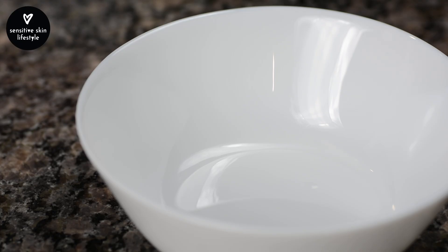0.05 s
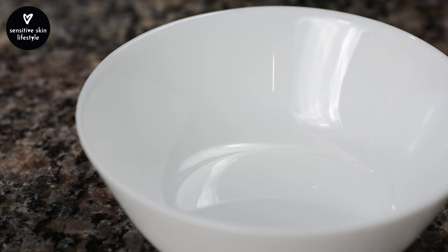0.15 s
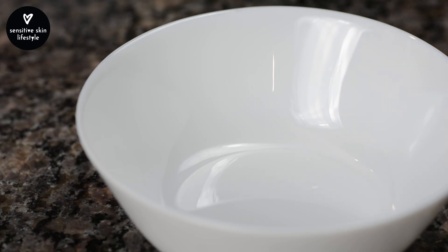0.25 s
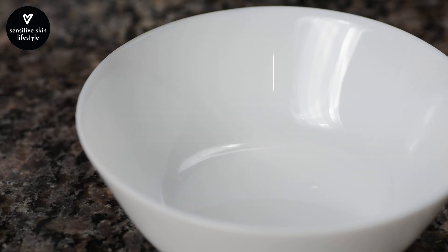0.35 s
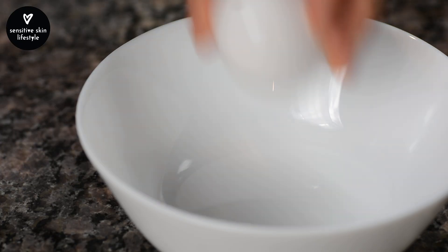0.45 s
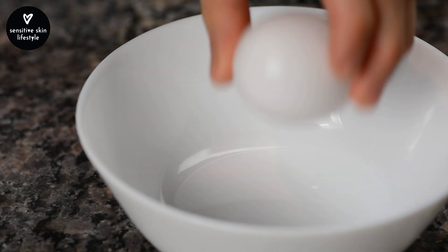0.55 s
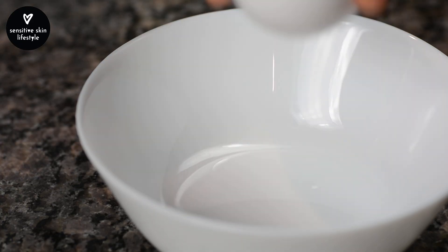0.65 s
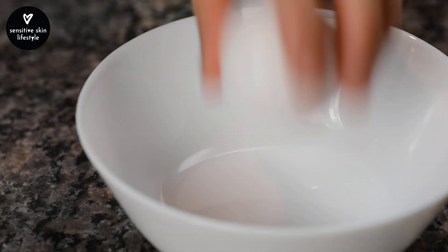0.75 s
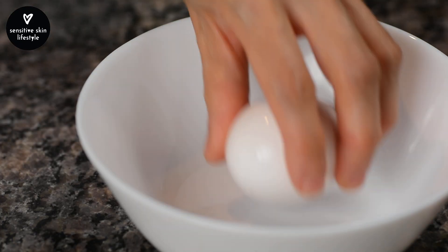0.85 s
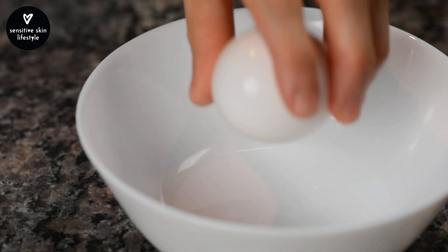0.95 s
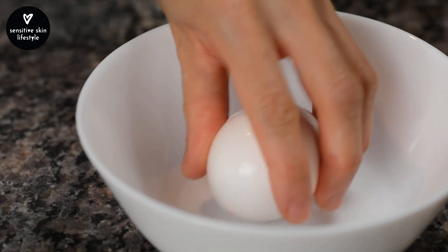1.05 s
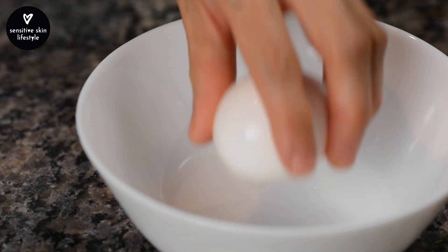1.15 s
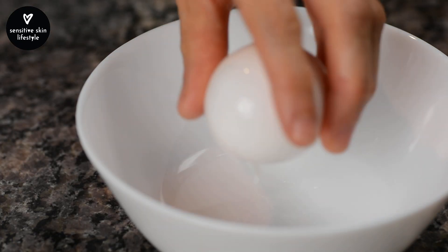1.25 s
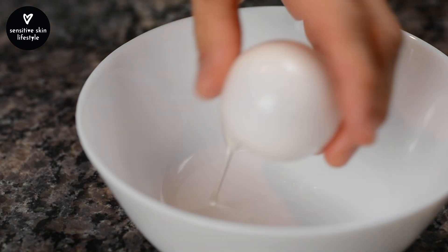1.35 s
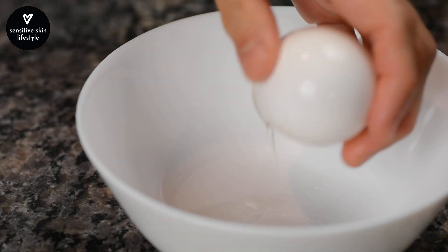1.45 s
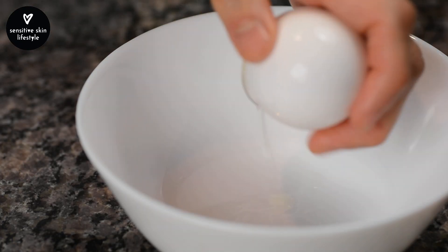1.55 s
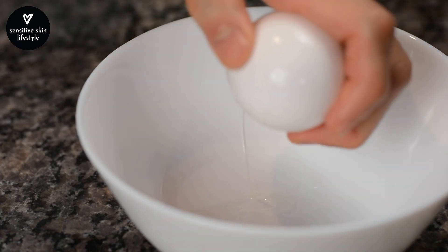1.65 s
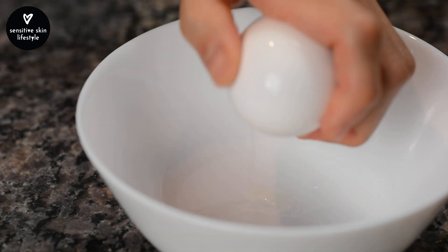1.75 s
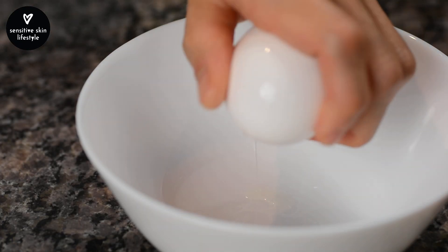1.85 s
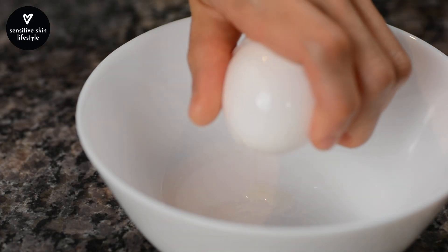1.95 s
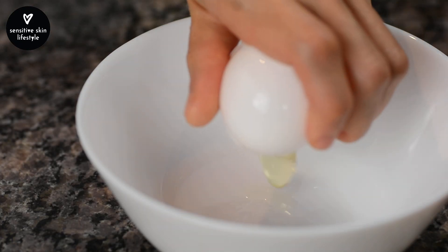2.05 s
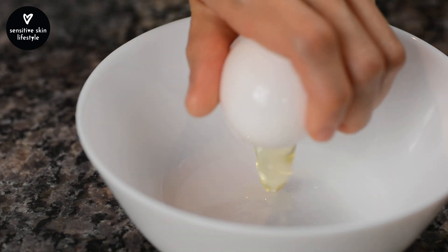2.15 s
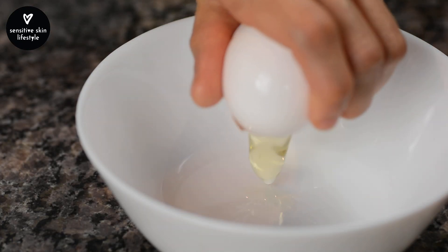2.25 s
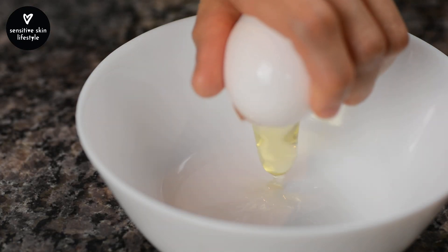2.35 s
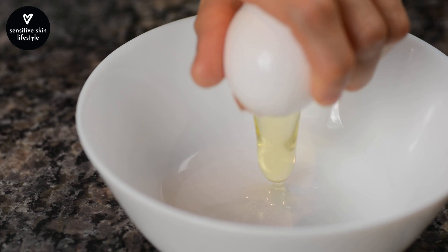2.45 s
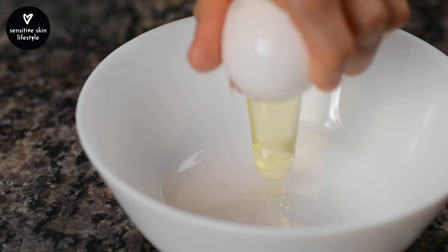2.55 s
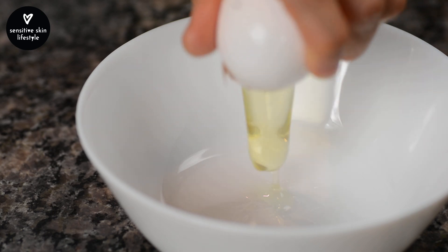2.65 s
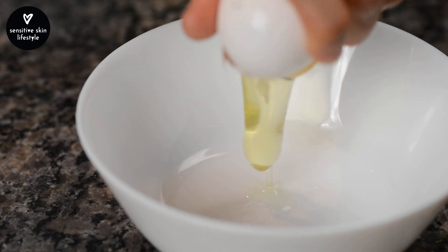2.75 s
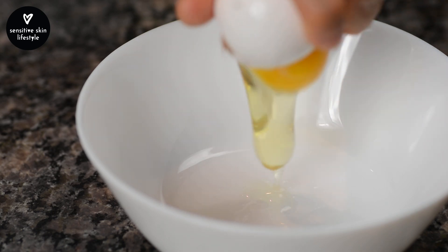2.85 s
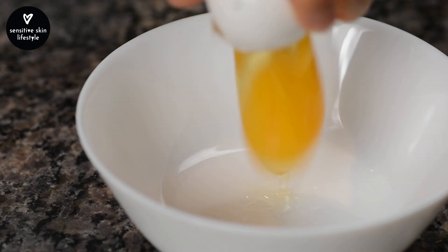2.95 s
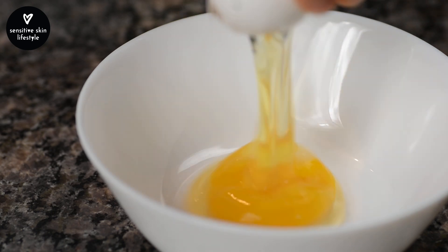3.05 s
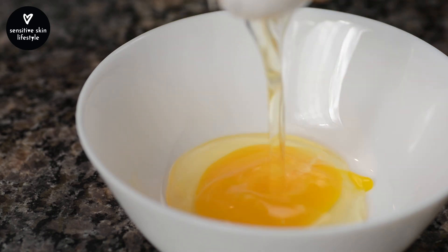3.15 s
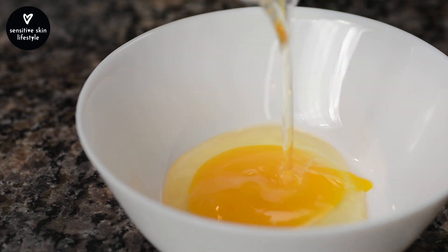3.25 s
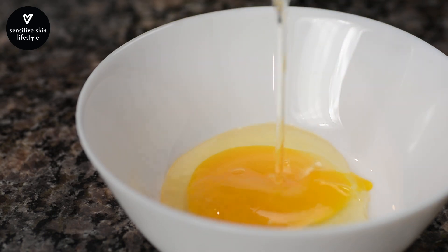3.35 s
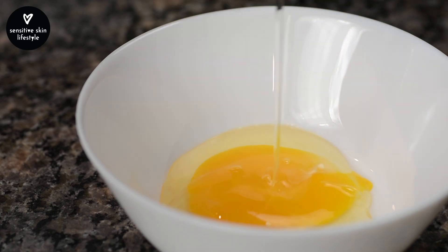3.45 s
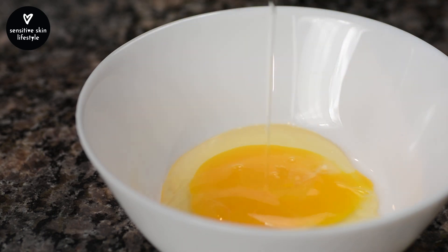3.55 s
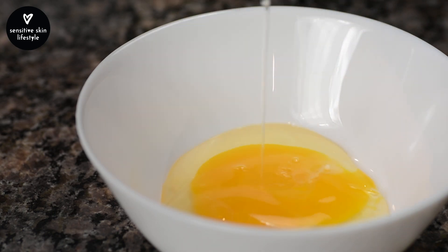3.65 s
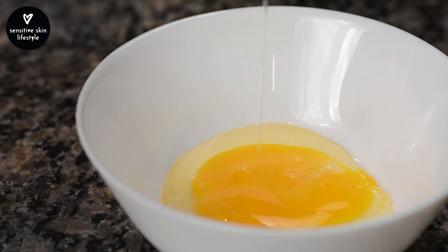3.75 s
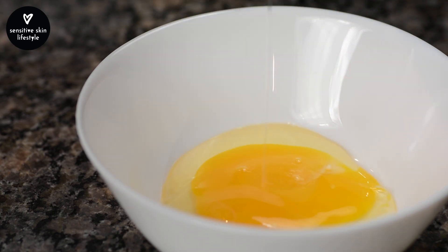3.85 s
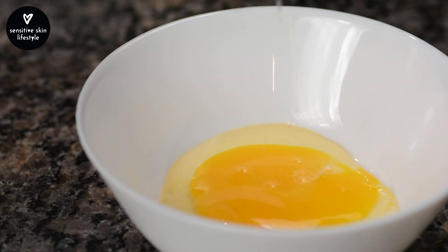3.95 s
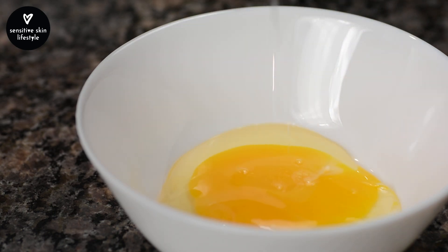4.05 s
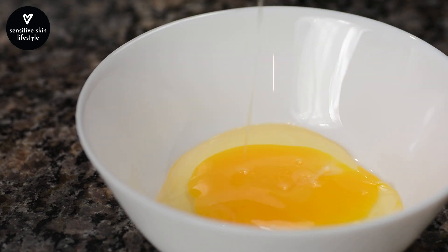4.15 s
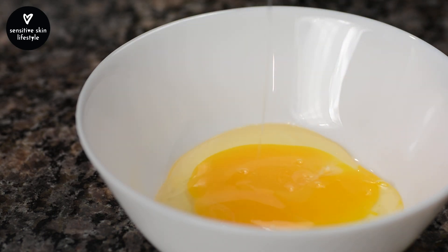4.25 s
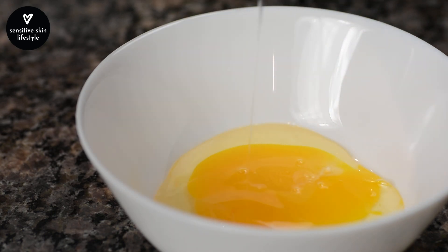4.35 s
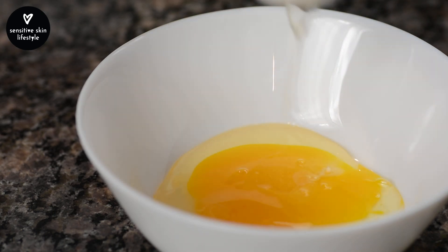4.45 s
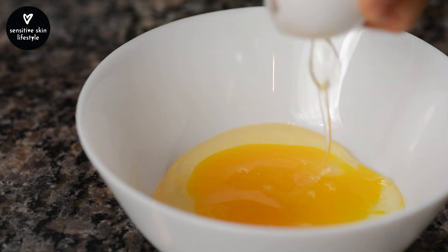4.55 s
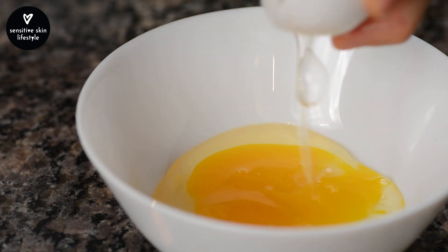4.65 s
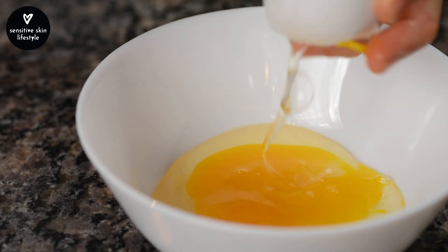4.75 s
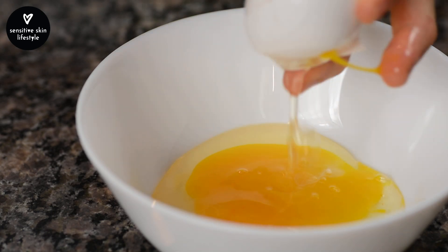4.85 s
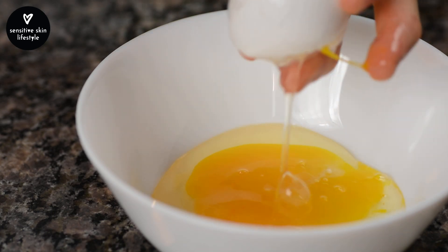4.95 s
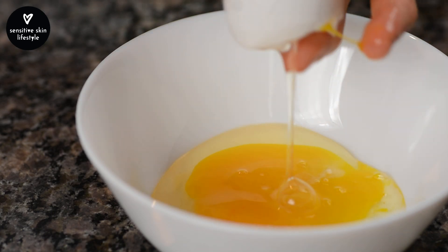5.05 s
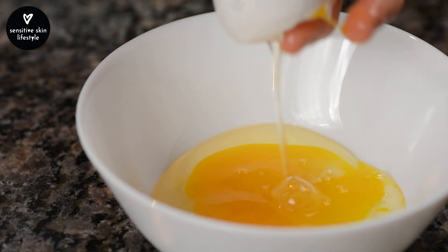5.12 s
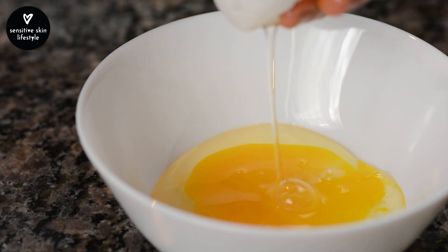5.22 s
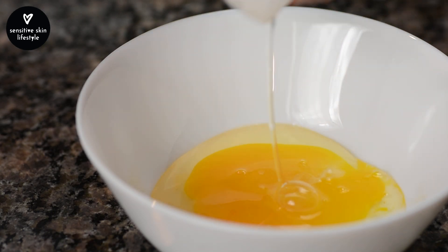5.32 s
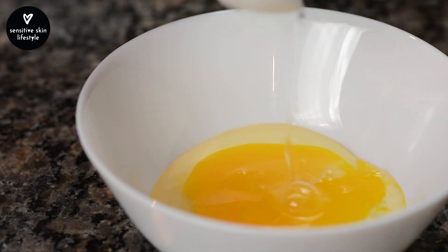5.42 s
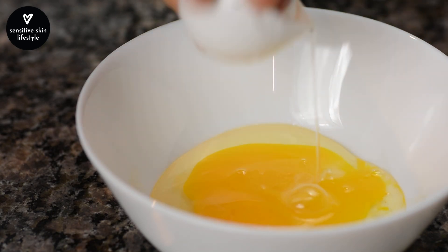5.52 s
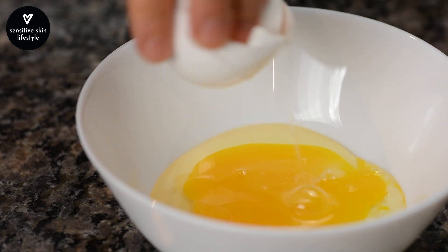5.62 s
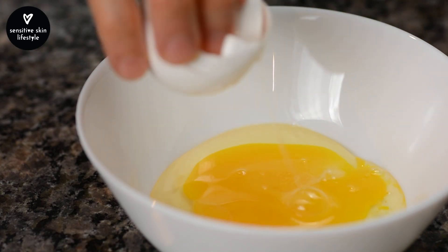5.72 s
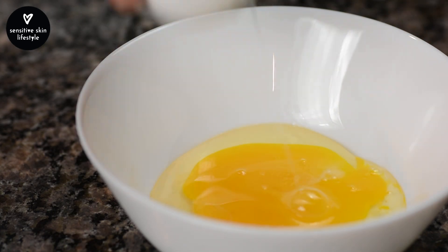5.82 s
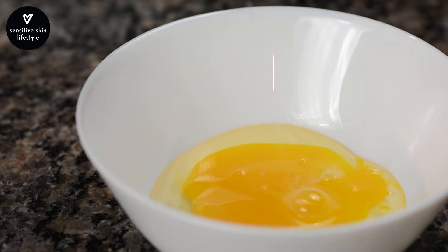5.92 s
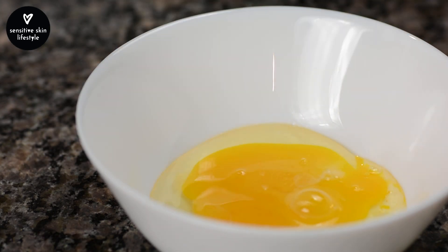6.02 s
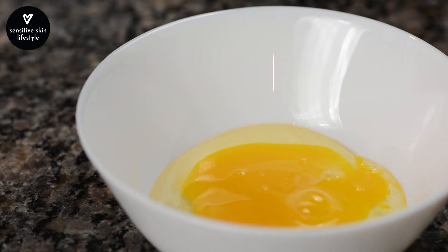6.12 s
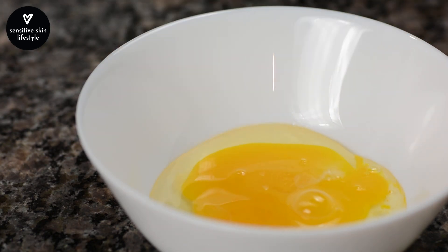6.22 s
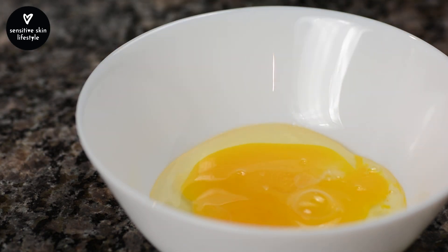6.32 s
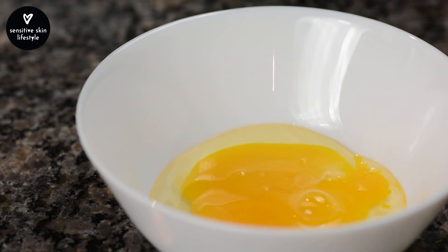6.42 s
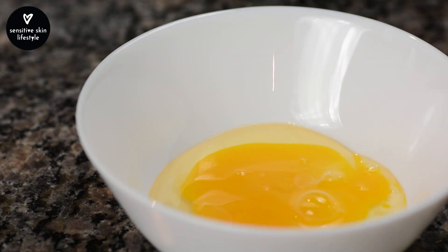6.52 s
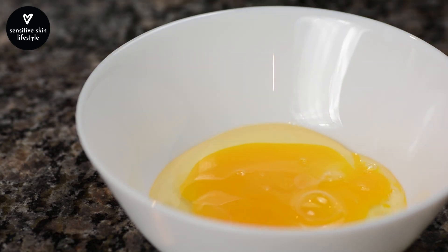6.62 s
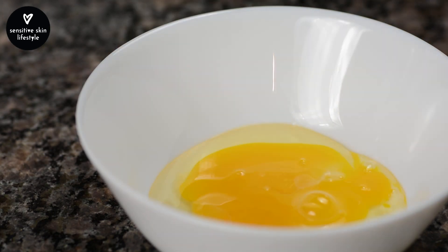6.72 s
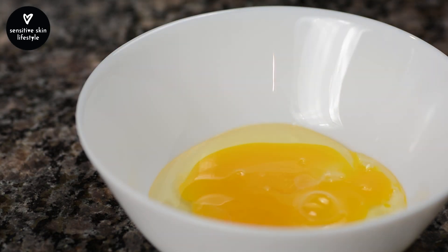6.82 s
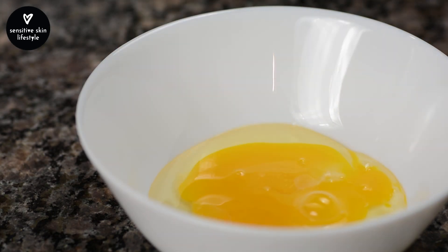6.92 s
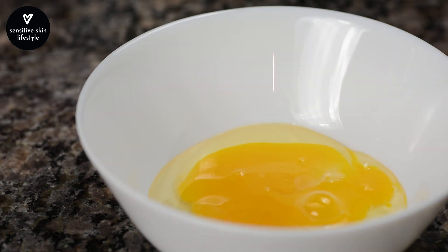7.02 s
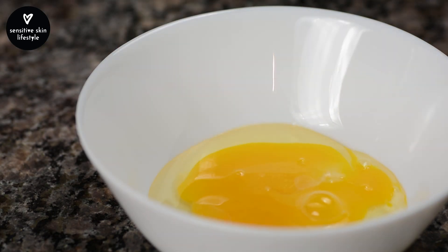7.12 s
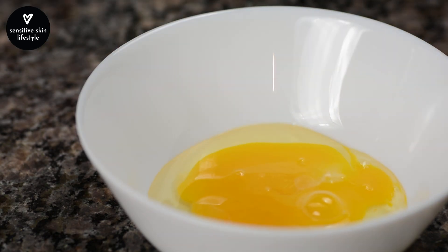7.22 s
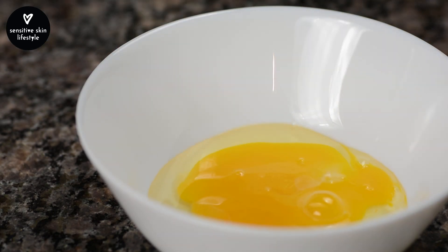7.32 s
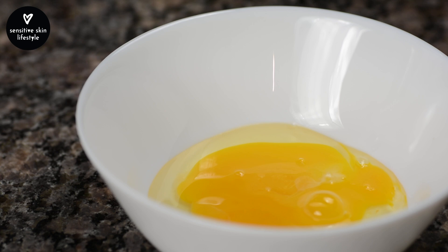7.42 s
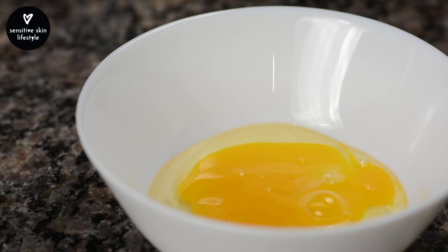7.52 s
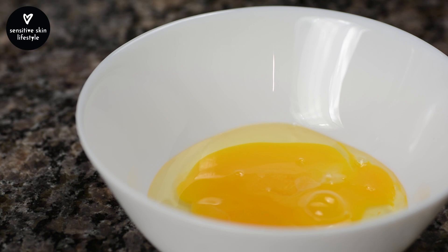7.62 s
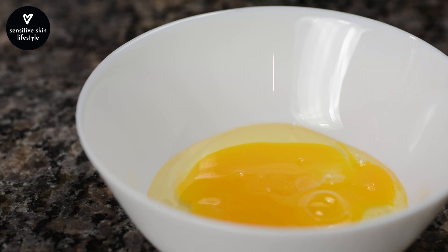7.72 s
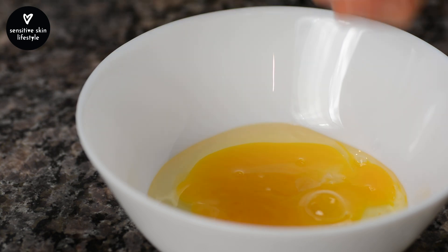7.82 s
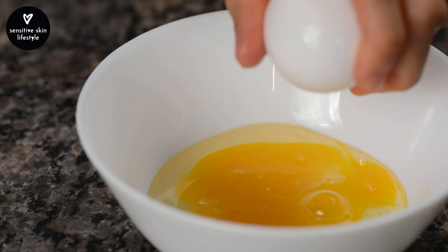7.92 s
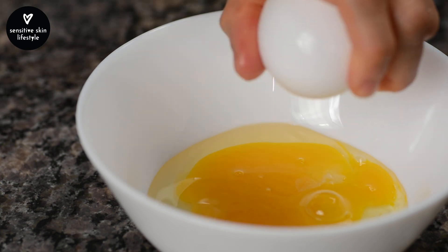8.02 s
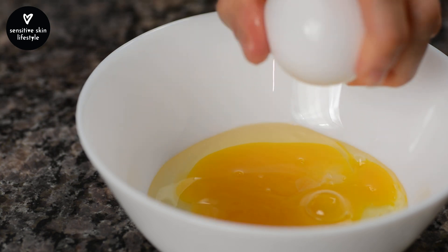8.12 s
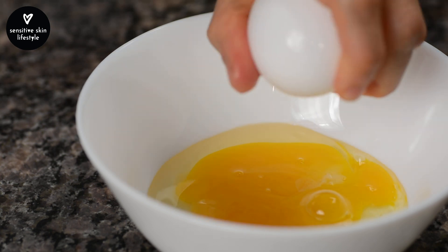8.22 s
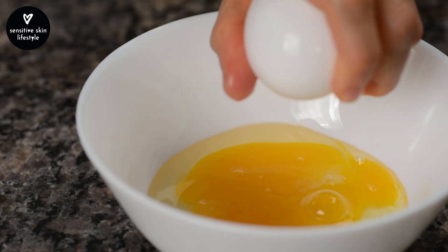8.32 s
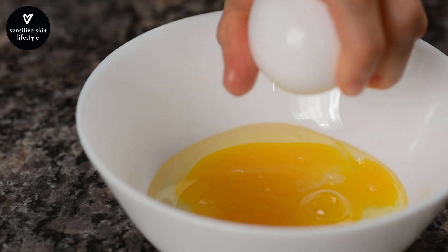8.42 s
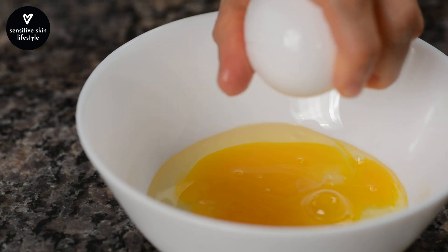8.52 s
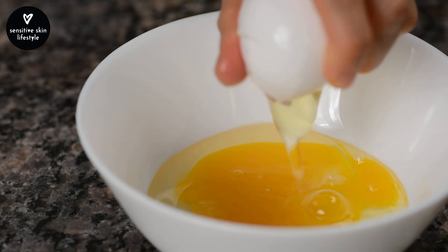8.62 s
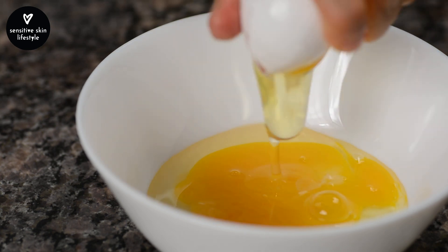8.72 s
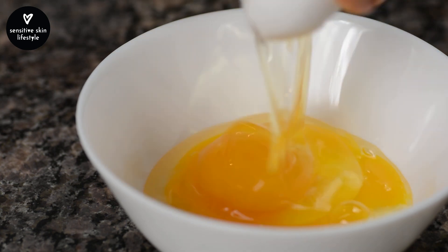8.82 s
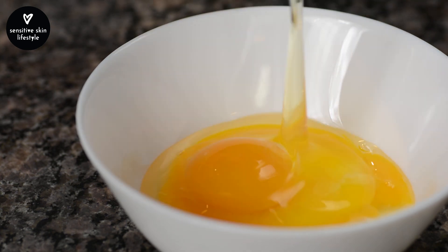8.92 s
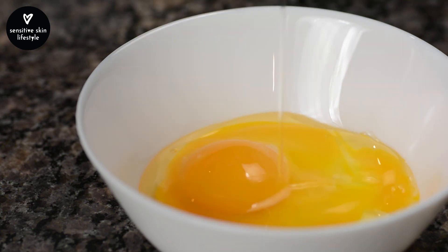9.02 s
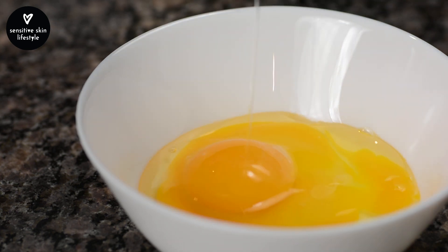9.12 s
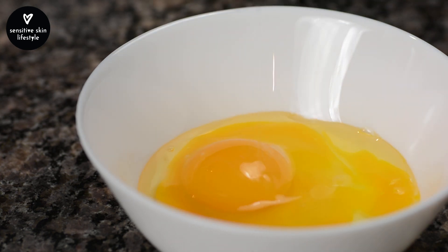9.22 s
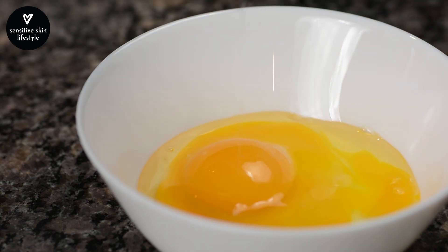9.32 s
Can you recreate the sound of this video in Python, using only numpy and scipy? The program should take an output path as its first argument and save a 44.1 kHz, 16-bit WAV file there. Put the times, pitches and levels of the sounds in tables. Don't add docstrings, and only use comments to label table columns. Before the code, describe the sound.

Sharp egg knocks, ringing bowl first and duller counter later, lead to brittle shell snaps and crunches in a hard room above faint fan noise.

```python
import sys
import numpy as np
from scipy import signal
from scipy.io import wavfile
from scipy.ndimage import uniform_filter1d

SR = 44100
rng = np.random.default_rng(int(sys.argv[2]) if len(sys.argv) > 2 else 0)


def field_ratio(decibels):
    return 10 ** (np.asarray(decibels, dtype=float) / 20)


def output_pcm(signal):
    pcm = np.clip(np.atleast_2d(signal).T, -1, 1) * 32767
    wavfile.write(sys.argv[1], SR, np.round(pcm).astype(np.int16))


N = 413216

# start_s, level_db, contact_ms, ring_against_crack_db, brittle_db_per_octave
KNOCKS = [
    (0.8359, 4, 1.9, 9.5, 1),
    (1.056, -1, 2.1, -1.5, 3),
    (6.5688, 0, 1, -7, -6),
    (6.8002, 2.5, 1.4, -7.5, 3.5),
    (7.0244, -12.5, 3.7, -6, 2.5),
]
# pitch_hz, width_hz, level_db
KNOCK_RINGS = [
    [(1230, 220, 0.5), (1650, 27, 4.9), (4127, 55, 12.5), (4004, 54, 13), (3958, 50, 8.5), (1370, 60, -2),
     (837, 22, -0.5), (4130, 4.05, 7.5), (980, 40, -6.5)],
    [(1243, 68, 3.5), (3990, 150, 6), (3200, 700, -7), (5400, 340, -4), (1387, 21, 5), (1330, 8, 6),
     (4060, 4, 5)],
    [(1600, 200, -2), (900, 130, -9), (2130, 300, -27), (3500, 130, -3), (1220, 73, -3)],
    [(1320, 140, -8.5), (2860, 240, 12), (1820, 200, -14), (5700, 460, -10), (3550, 260, 3)],
    [(1520, 170, 5), (1150, 220, 2), (2720, 250, -11), (410, 120, 3), (1610, 130, 4)],
]
# pitch_hz, level_db_per_hz
BOWL_CRACK = [(200, -42.5), (700, -18), (1100, -2), (1500, -0.8), (2100, -7), (4600, -13), (8000, -13.5),
              (16000, -15)]
COUNTER_CRACK = [(200, -29), (700, -11.5), (1100, -7), (1600, -3.4), (2600, -8), (4600, -16), (8000, -19.5),
                 (16000, -21)]
# start_s, level_db
THUDS = [
    (0.8346, -34.5),
]

# start_s, level_db, hollow_db, edge_db, fragment_pitch_hz
PRESS_FIRST = [(1.3677, -43, -2, -12, 4020), (1.6916, -42, -11, -9, 2400), (1.8066, -41.5, -2, -6, 2690),
               (1.89, -37.5, -10, -12, 3600), (1.9103, -27.5, -24, -6, 2010),
               (1.9315, -31.5, -12, -13, 3580), (1.9733, -15, 9.5, 6.5, 3760), (1.987, -20, -14, -4, 10400),
               (1.992, -16, -27, -14, 9500), (2.069, -30.5, -15, -15, 10400), (2.197, -34, -15, -9, 5730),
               (2.2121, -25, -8, -14.5, 7150), (2.2466, -28.5, -23, -9, 2100),
               (2.2826, -36, -22, -13, 2150), (2.3578, -34, -16, -13, 2900)]
# start_s, level_db, hollow_db, edge_db, fragment_pitch_hz
TEAR_FIRST = [(2.4141, -18.5, -13, -10, 7900), (2.4406, -12, -18.5, -20, 3300),
              (2.499, -10, -24.5, -8, 2880), (2.5528, -17, -42, -4, 7660), (2.5632, -15, -8, -12, 2300),
              (2.6317, -10, -9.5, -4.5, 2970), (2.6534, -22, -21, -16, 3570),
              (2.669, -21.5, -27, -15, 4340), (2.717, -25.5, -26, -6, 6500), (2.7473, -22.5, -25, -3, 4220),
              (2.9198, -30.5, -35, -22.5, 6800), (2.9783, -38.5, -19, -12, 6420),
              (3.019, -40, -13, -8, 3060), (3.1867, -41.5, -19, -11, 3030), (3.457, -43.5, -21, -22, 2950),
              (3.6212, -40.5, -5, -7, 2750), (5.3325, -24, -16, 0, 8200), (5.3389, -29.5, -22, -21, 4900),
              (6.5405, -42, -19, -18, 9000)]
# start_s, level_db, hollow_db, edge_db, fragment_pitch_hz
SCRAPES = [(4.188, -43.5, -1, -18, 1250), (4.2913, -42.5, 1, -12, 1230), (4.5135, -33, -7, -19, 2300),
           (4.5308, -32.5, -13, -14, 1590), (4.5643, -36, -17, -9, 1590), (4.584, -28.5, 4, -14, 1600),
           (4.6059, -28, -19, -16, 1900), (4.615, -27, -20, -13, 1520), (4.649, -35, -20, -17, 3320),
           (4.6684, -35, -6, -19, 1370), (4.7615, -40, 7, -4, 1200), (4.8457, -39.5, 12, -12, 1330),
           (4.8717, -29.5, 7, -10, 2700), (4.8733, -33, -17, -20, 4750), (4.9465, -32, -3, -9, 2340),
           (4.968, -24.5, -0.5, 4, 1220), (4.978, -27.5, -19, -1.5, 1320), (5.2868, -37.5, -6, -8, 1450),
           (5.355, -32, -5, -25, 2620), (5.408, -38, -6, -21, 1580), (5.521, -36.5, -5, -14, 1600),
           (6.3118, -35, -5, -13, 2950)]
# start_s, level_db, hollow_db, edge_db, fragment_pitch_hz
PRESS_SECOND = [(7.4624, -31, -16.5, -10, 2100), (7.6987, -22.5, -20, -6, 4200),
                (7.7168, -24.5, -25, -21.5, 4170), (7.7396, -23.5, -22, 0, 5530),
                (7.767, -29.5, -18, -14, 3600), (7.8762, -19.5, -14, -8, 2920), (7.9444, -32, -5, -5, 2830),
                (7.9823, -22.5, -7, -5, 3900), (8.056, -33.5, -19, -8, 3560), (8.1115, -25, -11, -14, 1980),
                (8.1242, -26.5, -19, -5, 2130), (8.1821, -26, -21, -9, 7250), (8.2012, -13, -8, -1, 6340),
                (8.214, -15.5, -24, -11.5, 10800), (8.2281, -18, -29, -21, 10700),
                (8.2368, -10.5, -5, 6, 3500), (8.2474, -15, -16, -16, 9000), (8.2759, -15.5, -10, -6, 2360),
                (8.3884, -16.5, -28, -12, 2000), (8.5206, -35.5, -24, 1, 2520)]
# start_s, level_db, hollow_db, edge_db, fragment_pitch_hz
TEAR_SECOND = [(8.6041, -13, -23, -18.5, 8600), (8.6394, -32, -15, -21, 3860),
               (8.6904, -19, -29, -13, 6400), (8.6974, -22.5, -28, -21, 3200),
               (8.7408, -22.5, -24, -17, 2500), (8.7554, -27, -23, -13, 2630),
               (8.7847, -20.5, -13, -6, 7240), (8.7977, -21, -14, -9, 10700), (8.8124, -23, -21, -11, 3360),
               (8.9409, -40, 12, -8, 4660), (8.9788, -19, -15.5, -14, 1260), (9.1529, -25, -9, -20, 2520),
               (9.2044, -37.5, -22.5, -18, 2340), (9.326, -37.5, 0, -9.5, 2000)]
SNAP_HZ = [100, 600, 1400, 2500, 4200, 6800, 11500, 17000]
# start_s, hardest_s, end_s, level_db, hollow_db
SQUEEZES = [
    (1.854, 2.266, 2.35, -53, -7),
    (2.576, 2.72, 3.12, -55, -10.5),
    (4.457, 4.62, 4.8, -45, 5),
    (4.836, 4.982, 5.08, -44, -4),
    (5.257, 5.408, 5.56, -57, -3),
    (7.87, 8.3, 8.42, -69, -4),
    (8.665, 8.8, 9.06, -37.5, -9),
]

# delay_ms, level_db
ECHOES = [(1.9, -6), (4.1, -8.5), (5.6, -2.5), (8.2, -11.5), (12.6, -14.5), (17.5, -21.5)]
# pitch_hz, decay_s
ROOM_DECAY = [(250, 0.45), (1000, 0.54), (2500, 0.52), (6000, 0.5), (11000, 0.35), (16000, .3)]
# pitch_hz, side_against_mid_db
ROOM_SIDE = [(500, -29.5), (2000, -21), (5000, -8.5), (9000, -4), (14000, -1)]
# pitch_hz, level_db
ROOM_COLOUR = [(300, 10), (1000, 1), (3000, -2.5), (7000, -4), (14000, -2.5)]

# pitch_hz, level_db_per_hz
FAN_AIR = [(20, -48), (45, -38), (65, -25.5), (100, -15), (200, -11.5), (400, -10.5), (900, -9.5),
           (1300, -11.5), (1700, -18), (2500, -20), (4300, -27), (6700, -34), (10000, -36.5),
           (16000, -39.5)]
FAN_LEVEL_DB = -48.5
# pitch_hz, width_hz, level_db
FAN_DUCT = [(103.5, 7.1, 14), (172.5, 17.6, 4.5), (238.3, 7.8, 3.5), (292.4, 22, 6.5), (400, 24, 11.5),
            (679, 41, 2), (1010, 68, -12)]
# pitch_hz, width_hz, level_db
FAN_WHINE = [(5800, 89, -81.5)]
# pitch_hz, side_against_mid_db
FAN_SIDE = [(40, -8), (80, -29), (150, -35), (400, -23), (800, -21.5), (1400, -17.5), (3100, -8),
            (6800, -2), (15000, 0.5)]


def evened(x):
    return x / np.sqrt(np.mean(x ** 2) + 1e-20)


def read(points, hz):
    f, value = np.transpose(points)
    return np.interp(np.log(hz + 1), np.log(f + 1), value)


def add(mix, start_s, sound):
    part = mix[..., round(start_s * SR):][..., :sound.shape[-1]]
    part += sound[..., :part.shape[-1]]


def colour(x, points):
    hz = abs(np.fft.fftfreq(x.shape[-1], 1 / SR))
    log_gain = np.log(field_ratio(read(points, hz)))
    response = np.exp(np.conj(signal.hilbert(log_gain)))
    return np.fft.ifft(np.fft.fft(x) * response).real


def resonate(x, hz, width_hz):
    r = np.exp(-np.pi * width_hz / SR)
    return signal.lfilter([1 - r, 0, r - 1], [1, -2 * r * np.cos(2 * np.pi * hz / SR), r * r], x)


def fracture(ms, uneven_db, size):
    t = np.arange(size) / SR
    unevenness = field_ratio(uneven_db * rng.exponential(1, size))
    blow = np.zeros((2, size))
    blow[0] = rng.standard_normal(size) * unevenness * np.exp(-1000 * t / max(ms, .1))
    blow[0, 0] = 3.7 / max(ms, .4)
    blow[1, 0] = np.linalg.norm(blow[0])
    return blow


def knock(row, crack, rings):
    start_s, level_db, contact_ms, ring_db, brittle_db = row
    blow = fracture(contact_ms, 1.95, size=32768)
    tone = sum(field_ratio(db) * resonate(blow[[1, 1]], hz, width) for hz, width, db in rings)
    shade = [(hz, db + brittle_db * max(np.log2(hz / 1600), 0)) for hz, db in crack]
    cracking = colour(blow, [(40, -62), *shade])
    sound = evened(cracking) + field_ratio(ring_db) * evened(tone)
    return start_s, field_ratio(level_db + 11.5) * sound / np.linalg.norm(sound[1])


def snap(row, shower_ms, uneven_db, body_db):
    start_s, level_db, hollow_db, edge_db, hz = row
    body_db = body_db + 0.38 * hollow_db
    upper_db = 0.32 * edge_db - 2.5
    levels_db = [hollow_db - 58, hollow_db, hollow_db + 6.5, body_db + 6.5, body_db + 6.5,
                 upper_db, edge_db + 2, edge_db]
    broad = colour(fracture(shower_ms, uneven_db, size=2048), list(zip(SNAP_HZ, levels_db)))
    sound = broad + 1.6 * resonate(broad, hz, hz / 5.9)
    return start_s + .0007, field_ratio(level_db + 2) * sound / abs(sound[0]).max()


def grind(start_s, hardest_s, end_s, level_db, hollow_db):
    t = np.arange(start_s, end_s, 1 / SR)
    size_draw, push_draw, chance = rng.random((N // 16, 3))[:len(t)].T
    happens = chance < 2500 / SR
    grit = field_ratio(-1.7 * np.log(1 - size_draw)) * (push_draw - .5) * happens
    bright = evened(signal.lfilter(*signal.butter(1, [2800, 11000], "band", fs=SR), grit))
    hollow = evened(resonate(resonate(grit, 1400, 1200), 1400, 1200))
    swell_db = np.interp(t, [start_s, hardest_s, end_s], [-10, 0, -16])
    sound = bright + field_ratio(hollow_db - 4) * hollow
    return start_s, field_ratio(level_db + swell_db - 11.5) * sound * signal.windows.tukey(len(t), .05)


def thud(start_s, level_db):
    t = np.arange(4096) / SR
    return start_s, field_ratio(level_db) * np.sin(2 * np.pi * 30 * t) * np.exp(-t / .012)


def kitchen(close, far):
    t = np.arange(2048)
    echoes = sum(field_ratio(db) * np.sinc(t - ms * SR / 1000) for ms, db in ECHOES)
    echoes = signal.lfilter(*signal.butter(1, 8000, fs=SR), echoes)
    near = close + signal.oaconvolve(close, echoes)[:N]

    hz, t, z = signal.stft(rng.standard_normal((2, SR)), SR, nperseg=256)
    fade_db = 60 * t / read(ROOM_DECAY, hz)[:, None]
    z = z * field_ratio(read(ROOM_COLOUR, hz)[:, None] - fade_db)
    z[1] *= field_ratio(read(ROOM_SIDE, hz))[:, None]
    mid, side = signal.istft(z, SR, nperseg=256)[1]
    build = 1 - np.exp(-np.arange(len(mid)) / SR / 0.0007)
    tail = np.array([mid + side, mid - side]) * build / np.linalg.norm(mid)
    return near * field_ratio([[-.3], [.3]]) + signal.fftconvolve(far[None], tail, axes=1)[:, :N]


def fan():
    frames, hz = N // 512 + 5, np.fft.rfftfreq(2048, 1 / SR)
    a, b, c, d, patches = rng.standard_normal((frames, 1025, 5)).T
    patches = uniform_filter1d(patches, size=14, axis=0)
    patches = evened(uniform_filter1d(patches, size=8, axis=1))
    lumps = sum(field_ratio(db) / (1 + (2 * (hz - f) / width) ** 2) for f, width, db in FAN_DUCT)
    gain = field_ratio(read(FAN_AIR, hz))[:, None] * (1 + 0.97 * lumps[:, None]) * field_ratio(1.2 * patches)
    spread = field_ratio(read(FAN_SIDE, hz))[:, None]
    z = gain * np.array([a + 1j * b, spread * (c + 1j * d)])
    mid, side = signal.istft(z, nperseg=2048, noverlap=1536)[1][:, :N]
    scale = field_ratio(FAN_LEVEL_DB) / np.std(mid)
    air = scale * np.array([field_ratio(-1.17) * (mid + side), field_ratio(-0.66) * (mid - side)])
    whine = sum(field_ratio(db) * evened(resonate(rng.standard_normal(N), f, w)) for f, w, db in FAN_WHINE)
    return air + whine


def scene():
    egg = np.zeros((2, N))
    counter = np.zeros(N)
    cracks = 2 * [BOWL_CRACK] + 3 * [COUNTER_CRACK]
    for row, crack, rings in zip(KNOCKS, cracks, KNOCK_RINGS):
        add(egg, *knock(row, crack, rings))
    for row in PRESS_FIRST + TEAR_FIRST + PRESS_SECOND + TEAR_SECOND:
        add(egg, *snap(row, shower_ms=0.72, uneven_db=4.47, body_db=-7))
    for row in SCRAPES:
        add(egg, *snap(row, shower_ms=2.6, uneven_db=1.8, body_db=-5.5))
    for row in SQUEEZES:
        add(egg, *grind(*row))
    for row in THUDS:
        add(counter, *thud(*row))
    egg = egg - 0.22 * resonate(egg, 5553, 700)
    return kitchen(*egg) + fan() + counter * field_ratio([[-5], [3]])


def top_cut(x):
    return signal.sosfilt(signal.butter(12, 16810, fs=SR, output="sos"), x)


def record(dry):
    limited = np.clip(dry, -1, 1)
    low_pass = signal.ellip(10, .1, 42, 15800, fs=SR, output="sos")
    mix = signal.sosfilt(low_pass, limited)
    return top_cut(mix)


dry = scene()
out = record(dry)
output_pcm(out)
```